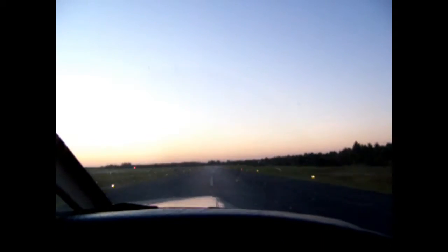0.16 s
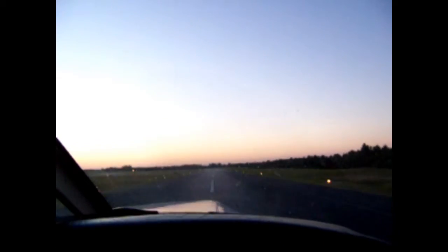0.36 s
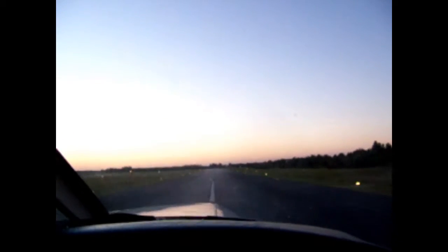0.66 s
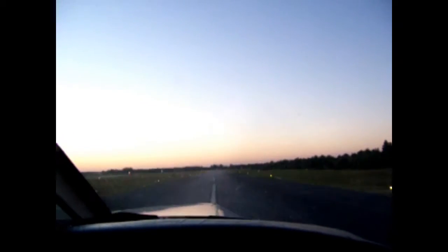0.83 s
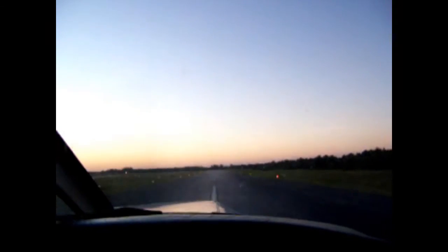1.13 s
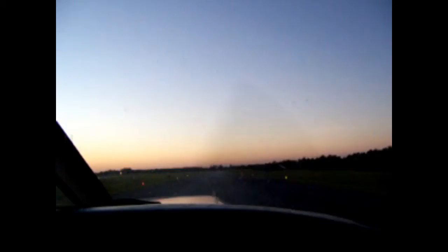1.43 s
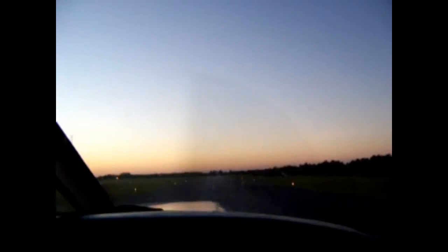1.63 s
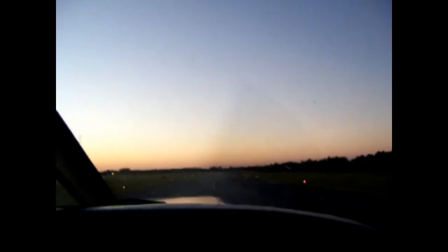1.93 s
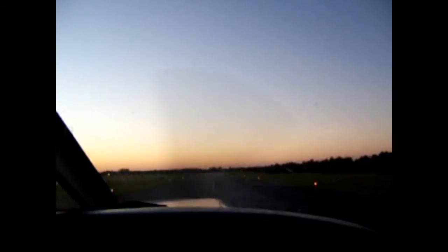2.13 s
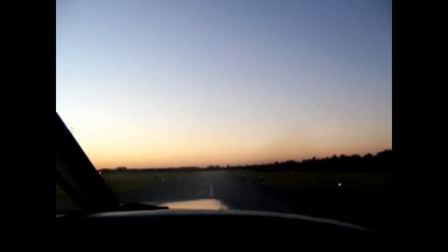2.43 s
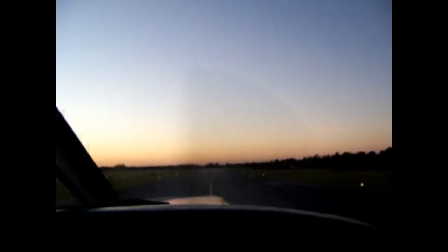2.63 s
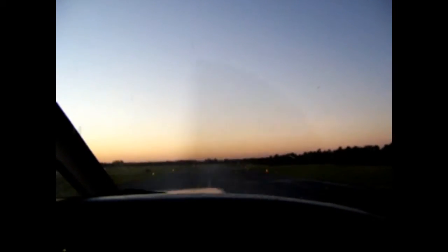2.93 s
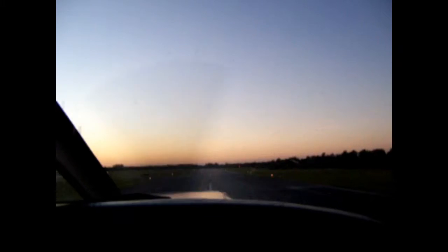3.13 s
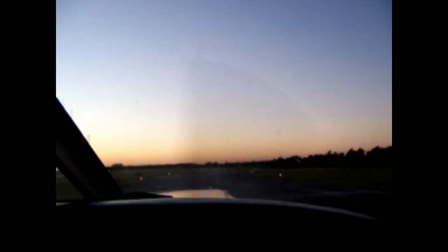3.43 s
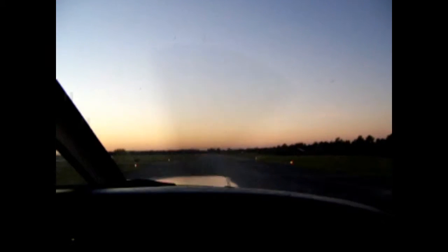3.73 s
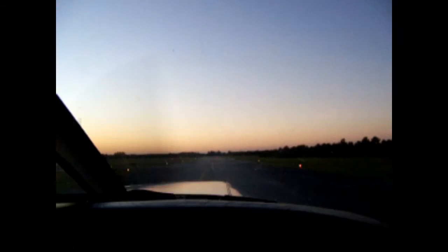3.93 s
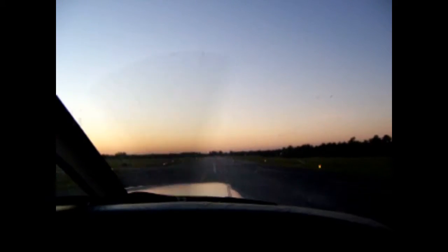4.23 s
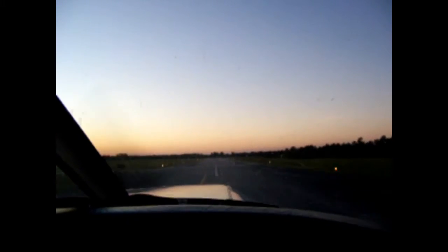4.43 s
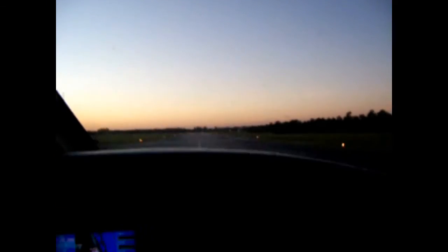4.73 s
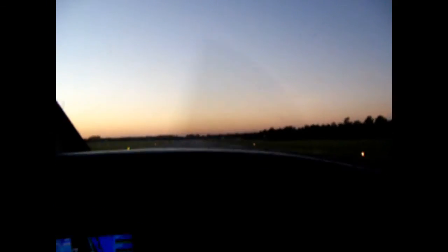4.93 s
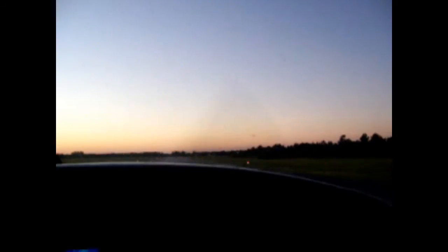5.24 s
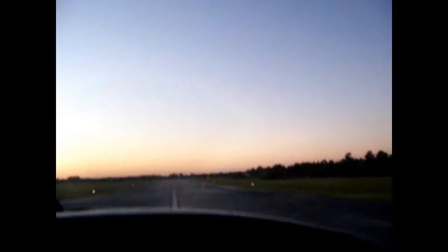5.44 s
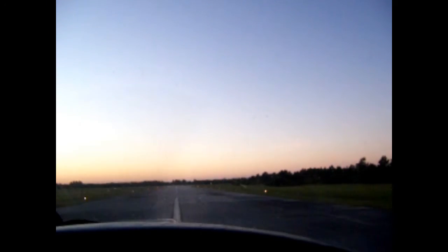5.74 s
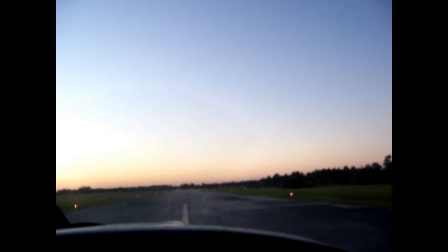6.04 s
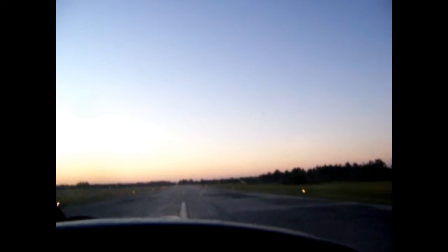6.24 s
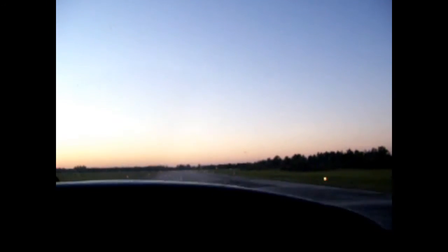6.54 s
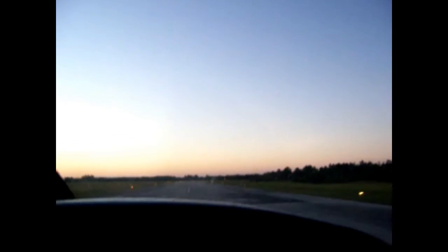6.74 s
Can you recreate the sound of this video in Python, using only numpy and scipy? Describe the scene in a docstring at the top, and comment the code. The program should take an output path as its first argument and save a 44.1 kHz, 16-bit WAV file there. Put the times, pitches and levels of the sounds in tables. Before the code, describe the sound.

Inside a small propeller plane, a low throttled-back engine throb and air rush, then tyre chirps, shuddering thumps, a loud clattering knock and rolling rumble.

```python
"""Inside a light aircraft as it lands: engine and propeller orders throb, throttled back, under shaped air noise.
Fittings creak now and then. The main tyres chirp (rising sines and skid noise), the gear legs shudder
(decaying harmonics with scrub noise), the airframe rocks and tarmac rumble sets in. The nose comes down with
a loud knock (ringing panel modes, noise crack). Last, the nose wheel spins up into shimmy, rumble and whine.
The sound passes through an 8 kHz track that overloads on peaks."""
import sys
import numpy as np
from scipy import signal
from scipy.fft import rfft, irfft, next_fast_len
from scipy.io import wavfile

SR = 44100
rng = np.random.default_rng(int(sys.argv[2]) if len(sys.argv) > 2 else 0)


def output_pcm(signal):
    """Save a mono or channel-first signal as 16-bit PCM at the path in sys.argv[1].

    Samples are clipped to [-1, 1] before scaling.
    """
    pcm = np.clip(np.atleast_2d(signal).T, -1, 1) * 32767
    wavfile.write(sys.argv[1], SR, np.round(pcm).astype(np.int16))


N = 303055
TIME_S = np.arange(N) / SR

# Shaft-locked lines: (multiple of crankshaft rate, relative rms level [dB])
ENGINE_ORDERS = [(.5, -26), (1, 2), (1.5, -27), (2, -2.5), (2.5, -15), (3.5, -21.5), (4, -11)]
PROPELLER_ORDERS = [(3, 0.5), (6, -16.5), (9, -23.5), (15, -23.5)]
EXHAUST_ORDERS = [(4, -5.5), (5, -0.5), (6, -14), (7, -24.5), (9, -20)]
# Noise spectra of air, tarmac, knock crack and rubbing fitting: (frequency [Hz], relative density [dB])
ROAR_SPECTRUM = [(10, 0), (20, -6), (45, 2.5), (80, -2), (125, 2), (180, -5), (240, -10), (360, -11),
                 (600, -14.5), (850, -13), (1100, -16), (1500, -25.5), (4000, -41)]
HISS_SPECTRUM = [(200, -20), (700, -8.5), (1100, -8), (1550, 1), (1870, -3), (2300, -1), (2780, -3),
                 (3100, -10), (3500, -11), (4000, -7.5)]
RUMBLE_SPECTRUM = [(12, -23), (35, -6.5), (65, 0.5), (130, -0.5), (165, -7.5), (210, -0.5), (320, -16),
                   (560, -18), (1000, -23), (1300, -22), (1500, -40), (2400, -32.5), (4000, -39)]
CRACK_SPECTRUM = [(100, 11), (400, 1), (800, 1.5), (1020, -5), (1300, -2.5), (1850, -12.5), (2400, -8.5),
                  (3500, -13), (4000, -8.5)]
RUB_SPECTRUM = [(1500, -31), (2600, 4), (3300, -3), (4000, -3)]
# Spectra of airframe rocking, tyre skid and tyre scrub: (frequency [Hz], relative density [dB])
ROCKING_SPECTRUM = [(10, -10), (28, 7), (65, -6), (135, -4), (250, -30), (1500, -74)]
SKID_SPECTRUM = [(300, -26), (750, 3), (1100, 1), (1600, -14.5), (4000, -27)]
SCRUB_SPECTRUM = [(80, -27), (220, -4.5), (450, 3.0), (1100, -13), (1600, -18), (4000, -27.5)]
# Resonances of cabin and panels, gear legs and floor, fitting: (frequency [Hz], width [Hz], lift [dB])
CABIN_RESONANCES = [(217, 17, 2), (283, 23, 6), (355, 14, 4), (459, 43, 5.5), (515, 19, 4), (692, 113, 7),
                    (776, 16, 4.5), (844, 13, 2), (944, 30, 4), (1217, 110, 6.5), (1446, 130, 4.5),
                    (1672, 47, 4.5), (2786, 78, 1.5), (3570, 33, 3.5)]
FLOOR_RESONANCES = [(269, 29, 1), (370, 27, 0), (435, 20, 7), (560, 27, 8.5), (697, 26, 9.5),
                    (903, 87, 8.5), (1123, 44, 8.5)]
FITTING_RESONANCES = [(2820, 190, 4), (3330, 250, 0)]
# Creaks of small fittings and tyre chirps: (time [s], length [s], level [dB])
CREAKS = [(.102, 0.013, -30), (4.507, 0.015, -30), (5.62, 0.011, -24.5), (5.943, 0.021, -27),
          (5.996, 0.019, -32)]
CHIRPS = [(4.745, 0.04, -16), (4.801, 0.058, -18.5), (4.877, 0.0055, -10.5), (4.906, 0.12, -23.5),
          (5.666, .012, -11)]
# Main leg shudders: (peak time [s], shakes per second [Hz], level [dB], T60 [s], scrub re shake [dB])
MAIN_STRIKES = [(4.818, 29, -13, 0.18, -13.5), (4.878, 42.5, -4.5, 0.69, -27)]
# Bumps through the gear legs, knocks in the cabin: (time [s], level [dB])
BUMPS = [(4.812, -19), (5.083, -18), (5.114, -5), (5.6, -14), (5.675, -11), (6.046, -4.5), (6.058, 1)]
KNOCKS = [(5.668, -10), (6.0415, 6), (6.0605, 3.5)]
# Ringing modes of airframe and panels: (frequency [Hz], relative level [dB], T60 [s])
AIRFRAME_MODES = [(66.7, -1, 0.16), (119, -6, .1), (159.84, -10, 0.12), (201, -17, 0.113)]
PANEL_MODES = [(162, -17.5, 0.24), (198, -12.5, 0.16), (298, -19.5, 0.19), (420, -34, 0.12),
               (539, -14, 0.094), (676, -16, 0.048), (805, -24, 0.11), (890, -38, 0.078),
               (1179, -16.5, 0.11), (1436, -24, 0.079), (2187, -29, 0.13), (2380, -35, 0.092),
               (2400, -30, 0.09), (2860, -31, 0.078), (3490, -24.5, 0.048)]

# Crankshaft sinks exponentially towards idle
START_HZ, IDLE_HZ, RUN_DOWN_S = 35.6, 33.1, 2.6
# Level at idle, and its change at the starting speed
SHAKE_DB, SHAKE_POWER_DB = -29.5, 7
BLADE_DB, BLADE_POWER_DB = -24, -13.5
# Exhaust drone swells, holds and fades as the engine slows
DRONE_FROM_S, DRONE_DB, DRONE_ATTACK_S, DRONE_HOLD_S, DRONE_T60_S = -0.91, -31, 1.48, 1.42, 8.2
# Main wheels meet the runway; later the nose wheel starts to spin up
TOUCHDOWN_S, NOSE_SPIN_FROM_S, NOSE_SPIN_UP_S = 4.745, 6.4, 0.17
# Air level at the start and its slope; the ground slope adds to the glide slope after touchdown
ROAR_DB, ROAR_GLIDE_DB_PER_S, ROAR_GROUND_DB_PER_S = -23, -0.1756, -2
HISS_DB, HISS_GLIDE_DB_PER_S, HISS_GROUND_DB_PER_S = -30, -0.7756, -1.5
# Main wheels rolling, extra while they skid, nose wheel at full speed
RUMBLE_DB, SKID_RUMBLE_DB, NOSE_RUMBLE_DB = -22.5, -25.5, -24.5
UNEVEN_DB, UNEVEN_HZ = 1.3, 15  # tarmac flutter
ROCKING_DB = -16
WHINE_HZ, WHINE_WIDTH_HZ, WHINE_DB, NOSE_WHINE_DB = 1186, 49, -42.5, -30
STRIKE_ATTACK_S = 0.025
# Nose leg shakes harder with a power of the wheel speed
NOSE_TURNS_HZ, SHIMMY_POWER, SHIMMY_DB, SHIMMY_SCRUB_DB = 49.66, 3.7, -16.5, -10.5
# Squeal at touchdown, then rising and fading as the main wheels spin up, leaving the rough skid
SQUEAL_HZ, SQUEAL_RISE_HZ_PER_S, SQUEAL_FADE_DB_PER_S, SKID_DB = 760, 1300, -42, -6.5
# Each knock chatters in quick contacts; the loose part bounces and chatters again
CHATTER_S, CHATTER_LOSS_DB, BOUNCE_S, BOUNCE_LOSS_DB = 0.0063, 5, 0.036, 24
TRACK_RATE_HZ, CUTOFF_HZ = 8000, 15600


def from_db(db):
    """Decibels to amplitude gain."""
    return 10 ** (np.asarray(db) / 20)


def rms_one(x):
    """Scale to unit rms."""
    return x / np.sqrt(np.mean(x ** 2) + 1e-20)


def since(start_s):
    """Seconds elapsed from start_s; zero before."""
    return np.maximum(TIME_S - start_s, 0)


def envelope(start_s, attack_s, hold_s, t60_s):
    """Linear rise to 1, hold, exponential decay."""
    rise = np.minimum(since(start_s) / attack_s, 1)
    return rise * from_db(-60 * since(start_s + attack_s + hold_s) / t60_s)


def swell(start_s, length_s):
    """Half-sine arch of height 1."""
    out, start, size = np.zeros(N), int(start_s * SR), max(int(length_s * SR), 2)
    out[start:start + size] = np.abs(np.sin(np.linspace(0, np.pi, size)))
    return out


def drift(rate_hz):
    """Slow noise of unit rms: two poles at rate_hz, run at SR / 40 and interpolated."""
    step = 40
    pole = np.exp(-2 * np.pi * rate_hz * step / SR)
    white = rng.standard_normal(N // step + 2002)
    slow = signal.lfilter([1], [1, -2 * pole, pole ** 2], white)[2000:]  # drop the filter's start
    return np.interp(np.arange(N) / step, np.arange(len(slow)), rms_one(slow))


def noise(spectrum, resonances=()):
    """Noise of unit rms with a broad spectrum, lifted at the resonances."""
    size = next_fast_len(N)
    bins_hz = np.maximum(np.arange(size // 2 + 1) * SR / size, 1)
    hz, db = np.transpose(spectrum)
    shape_db = np.interp(np.log(bins_hz), np.log(hz), db)
    for centre_hz, width_hz, lift_db in resonances:
        shape_db = shape_db + lift_db / (1 + (2 * (bins_hz - centre_hz) / width_hz) ** 2)
    in_band = bins_hz < 0.55 * TRACK_RATE_HZ
    white = rfft(rng.standard_normal(size))
    return rms_one(irfft(white * from_db(shape_db) * in_band, size)[:N])


def ring(drive, hz, t60_s):
    """Two-pole resonator: a unit click rings as a decaying sine of height about 1."""
    pole, w = from_db(-60 / (t60_s * SR)), 2 * np.pi * hz / SR
    return signal.lfilter([0, np.sin(w)], [1, -2 * pole * np.cos(w), pole ** 2], drive + 1e-18)


def blows(events, scatter_db=0):
    """One click per event, with random scatter in strength."""
    time_s, db = np.transpose(events)
    clicks = np.zeros(N)
    strength_db = db + scatter_db * rng.standard_normal(len(time_s))
    clicks[np.round(time_s * SR).astype(int)] = from_db(strength_db)
    return clicks


def strike(events, modes, scatter_db):
    """Every blow excites each mode with its own strength; mode signs alternate."""
    out = np.zeros(N)
    for k, (hz, db, t60_s) in enumerate(modes):
        out += (-1) ** k * from_db(db) * ring(blows(events, scatter_db), hz, t60_s)
    return out


def dying(events, t60_s):
    """Envelope that jumps at each blow and decays; blows add in power."""
    power_decay = from_db(-120 / (t60_s * SR))
    return np.sqrt(signal.lfilter([1], [1, -power_decay], blows(events) ** 2 + 1e-18))


def orders(angle, table, waver):
    """Shaft-locked lines, each wavering; phase grows with order squared, smearing the pulse of each turn."""
    out = np.zeros(N)
    for k, db in table:
        level = np.sqrt(2) * from_db(db) * (1 + waver * drift(11.2))
        phase = k * angle - 0.3 * k ** 2 + 0.57 * drift(0.97)
        out -= level * np.cos(phase)
    return out


def air(angle):
    """Air rush quietens in the glide, faster on the ground; exhaust beats modulate it slightly."""
    on_ground_s = since(TOUCHDOWN_S)
    roar_db = ROAR_DB + ROAR_GLIDE_DB_PER_S * TIME_S + ROAR_GROUND_DB_PER_S * on_ground_s
    hiss_db = HISS_DB + HISS_GLIDE_DB_PER_S * TIME_S + HISS_GROUND_DB_PER_S * on_ground_s
    beat = np.cos(2 * angle)  # four cylinders fire twice a turn
    roar = from_db(roar_db + 0.38 * drift(24) + 0.27 * beat) * noise(ROAR_SPECTRUM, CABIN_RESONANCES)
    hiss = from_db(hiss_db + 0.66 * drift(35) + 0.2 * beat) * noise(HISS_SPECTRUM, CABIN_RESONANCES)
    return roar + hiss


def engine_and_air():
    """Engine, propeller and exhaust lines follow one slowing crankshaft, which also beats in the air rush."""
    power = np.exp(-TIME_S / RUN_DOWN_S)
    turns_hz = IDLE_HZ + (START_HZ - IDLE_HZ) * power
    angle = 2 * np.pi * np.cumsum(turns_hz * (1 + 0.00086 * drift(6.7))) / SR
    engine_gain = from_db(SHAKE_DB + SHAKE_POWER_DB * power)
    engine = engine_gain * orders(angle, ENGINE_ORDERS, waver=0.34)
    propeller_gain = from_db(BLADE_DB + BLADE_POWER_DB * power ** 2)
    propeller = propeller_gain * orders(angle, PROPELLER_ORDERS, waver=0.11)
    drone = from_db(DRONE_DB) * envelope(DRONE_FROM_S, DRONE_ATTACK_S, DRONE_HOLD_S, DRONE_T60_S)
    exhaust = drone * orders(angle, EXHAUST_ORDERS, waver=0.13)
    return engine + propeller + exhaust + air(angle)


def creaks():
    """A fitting slips for some milliseconds as the cabin flexes: arched bursts of resonant noise."""
    bursts = sum(from_db(db) * swell(start_s, length_s) for start_s, length_s, db in CREAKS)
    return noise(RUB_SPECTRUM, FITTING_RESONANCES) * bursts


def nose_spin():
    """Nose wheel speed as a share of ground speed."""
    return 1 - np.exp(-since(NOSE_SPIN_FROM_S) / NOSE_SPIN_UP_S)


def rolling():
    """Uneven tarmac rumbles through the legs, the airframe rocks on its springs, spinning wheels whine."""
    main = np.minimum(since(TOUCHDOWN_S) / 0.067, 1)
    skidding = envelope(TOUCHDOWN_S, attack_s=0.14, hold_s=0.096, t60_s=0.14)
    nose = nose_spin() ** SHIMMY_POWER
    load = from_db(RUMBLE_DB) * main + from_db(SKID_RUMBLE_DB) * skidding + from_db(NOSE_RUMBLE_DB) * nose
    flutter = from_db(UNEVEN_DB * drift(UNEVEN_HZ))
    rumble = load * flutter * noise(RUMBLE_SPECTRUM, FLOOR_RESONANCES)
    sway = envelope(TOUCHDOWN_S, attack_s=0.27, hold_s=0.19, t60_s=0.41)
    rocking = from_db(ROCKING_DB) * sway * noise(ROCKING_SPECTRUM)
    whine_t60_s = np.log(1000) / (np.pi * WHINE_WIDTH_HZ)
    whine = rms_one(ring(rng.standard_normal(N), WHINE_HZ, whine_t60_s))
    whine_gain = from_db(WHINE_DB) * main + from_db(NOSE_WHINE_DB) * nose
    return rumble + rocking + whine_gain * whine


def shudder(angle, second_db, third_db, scrub_db):
    """A wheel shakes its leg in three harmonics; tyre scrub noise peaks with the fundamental."""
    shake = np.cos(angle) + from_db(second_db) * np.cos(2 * angle) + from_db(third_db) * np.cos(3 * angle)
    scrub = from_db(scrub_db + 3.1 * np.cos(angle)) * noise(SCRUB_SPECTRUM)
    return np.sqrt(2) * shake + scrub


def nose_gear():
    """The nose wheel shimmies faster and harder as it comes up to speed."""
    spin = nose_spin()
    angle = 2 * np.pi * np.cumsum(NOSE_TURNS_HZ * spin) / SR
    strength = from_db(SHIMMY_DB) * spin ** SHIMMY_POWER
    return strength * shudder(angle, second_db=6, third_db=-8.5, scrub_db=SHIMMY_SCRUB_DB)


def main_gear():
    """Each runway strike sets a main leg shuddering at a fixed rate, and the shudder dies away."""
    out = np.zeros(N)
    for peak_s, hz, db, t60_s, scrub_db in MAIN_STRIKES:
        strength = from_db(db) * envelope(peak_s - STRIKE_ATTACK_S, STRIKE_ATTACK_S, 0, t60_s)
        angle = 2 * np.pi * hz * (TIME_S - peak_s)
        out += strength * shudder(angle, second_db=-15, third_db=-24, scrub_db=scrub_db)
    return out


def chirps():
    """Rubber sticks and slips: short rough squeals, higher as the wheels catch up with the ground."""
    age_s = since(TOUCHDOWN_S)
    hz = (SQUEAL_HZ + SQUEAL_RISE_HZ_PER_S * age_s) * (1 + 0.027 * drift(151))
    tone = np.sin(2 * np.pi * np.cumsum(hz) / SR)
    squeal = np.sqrt(2) * from_db(SQUEAL_FADE_DB_PER_S * age_s) * tone
    skid = from_db(SKID_DB) * noise(SKID_SPECTRUM)
    bursts = sum(from_db(db) * np.sqrt(swell(start_s, length_s)) for start_s, length_s, db in CHIRPS)
    return (squeal + skid) * bursts


def clatter(knocks, count):
    """Contacts as (time [s], level [dB]): count groups per knock, each of count touches."""
    contacts = []
    for knock_s, db in knocks:
        for bounce in range(count):
            for touch in range(count):
                touch_s = CHATTER_S * touch * (1 + 0.03 * rng.standard_normal())
                contact_db = db - BOUNCE_LOSS_DB * bounce - CHATTER_LOSS_DB * touch
                contacts.append((knock_s + BOUNCE_S * bounce + touch_s, contact_db))
    return contacts


def impacts():
    """Bumps boom in airframe modes; knocks clatter in panel modes with a noise crack and short cabin tail."""
    contacts = clatter(KNOCKS, count=3)
    boom = strike(BUMPS, AIRFRAME_MODES, scatter_db=1)
    knock = strike(contacts, PANEL_MODES, scatter_db=1.5)
    crack_envelope = from_db(-10.5) * dying(contacts, t60_s=0.027)
    tail_envelope = from_db(-22.0) * dying(contacts, t60_s=0.39)
    return boom + knock + noise(CRACK_SPECTRUM) * (crack_envelope + tail_envelope)


def scene():
    """Sum of all sources, one channel."""
    background = engine_and_air() + creaks() + rolling()
    landing = nose_gear() + main_gear() + chirps() + impacts()
    return (background + landing)[None]


def record(dry):
    """8 kHz track saturates on peaks; straight-line playback mirrors faint treble above 4 kHz; short end fade."""
    track = signal.resample_poly(dry[0], TRACK_RATE_HZ, int(SR), padtype="edge")
    track = track / (1 + track ** 8) ** (1 / 8)
    # Straight lines between samples, drawn at 4 * SR
    played = np.interp(np.arange(4 * N) / (4 * SR), np.arange(len(track)) / TRACK_RATE_HZ, track)
    played = signal.resample_poly(played, 1, 4, padtype="edge")
    played = played * np.minimum((TIME_S[-1] - TIME_S) / 0.005, 1)
    low_pass = signal.ellip(10, 0.2, 80, CUTOFF_HZ, fs=SR, output="sos")
    return signal.sosfilt(low_pass, played)[None]


dry = scene()
out = record(dry)
output_pcm(out)
```